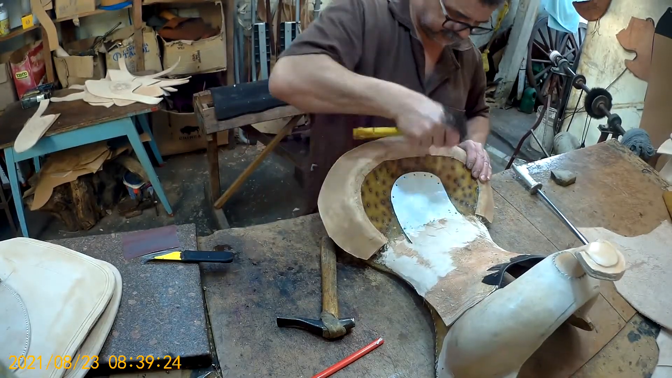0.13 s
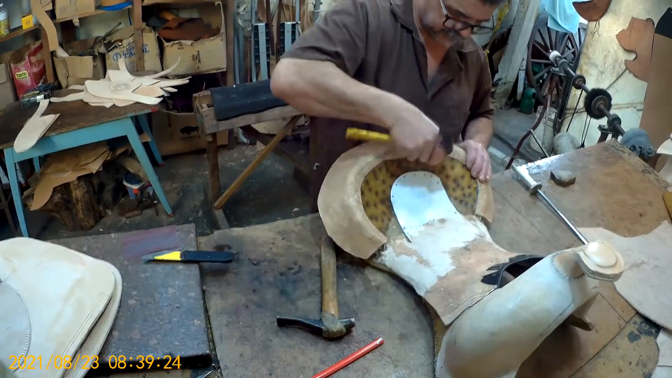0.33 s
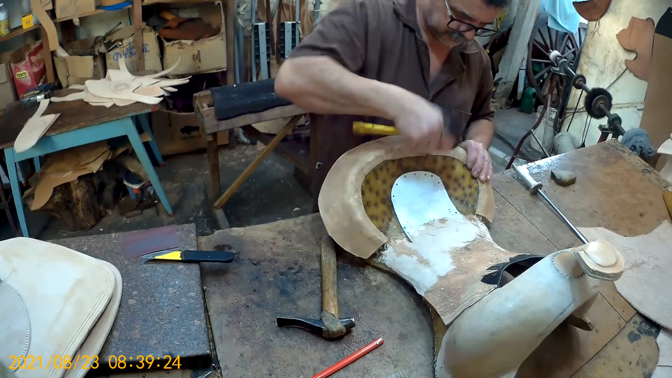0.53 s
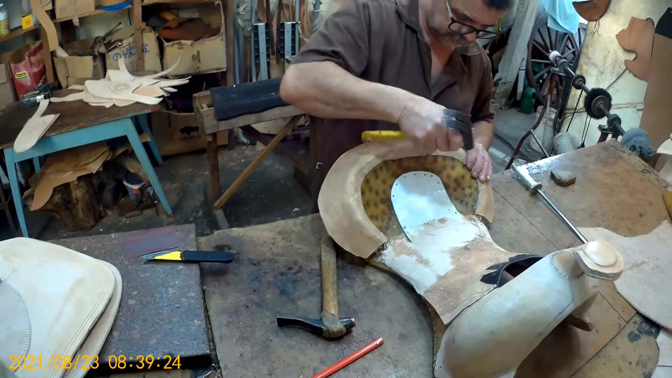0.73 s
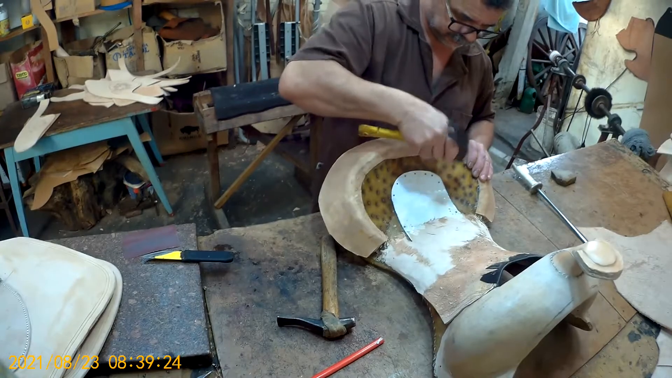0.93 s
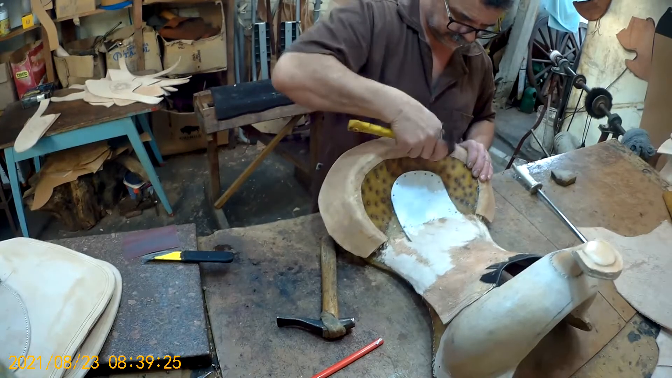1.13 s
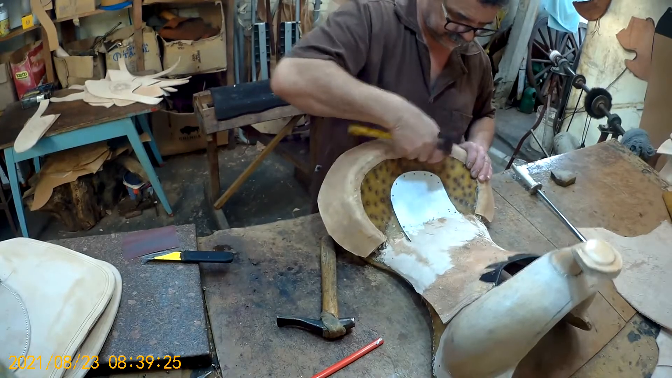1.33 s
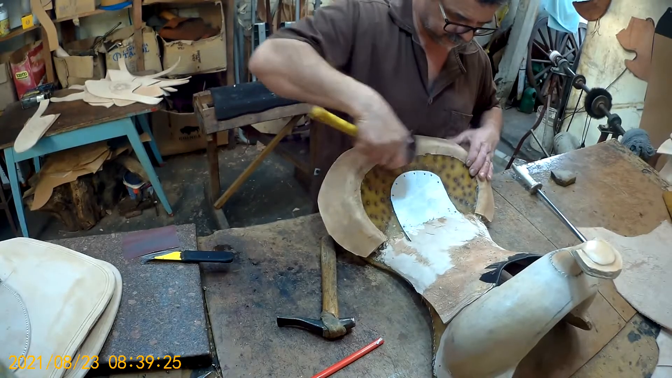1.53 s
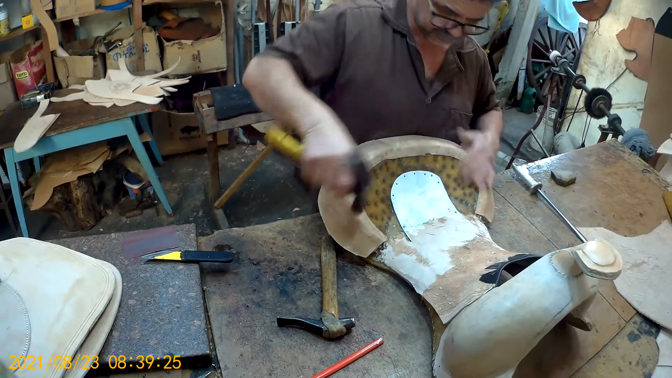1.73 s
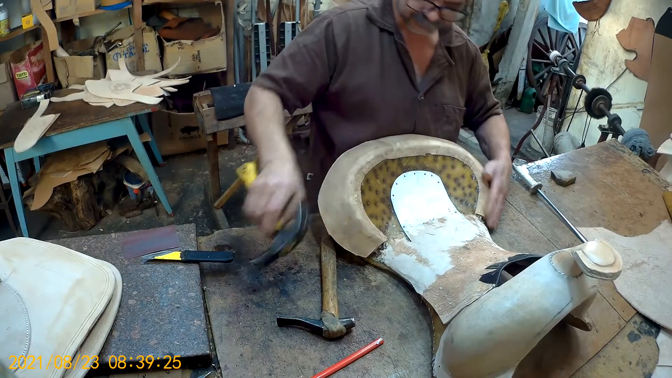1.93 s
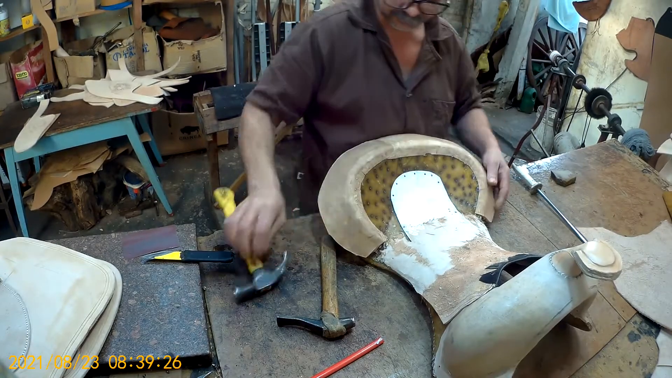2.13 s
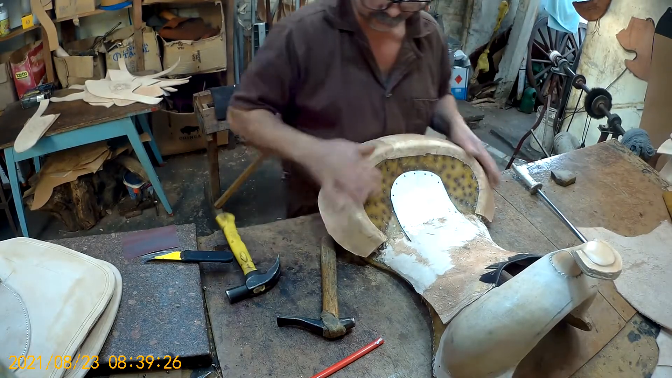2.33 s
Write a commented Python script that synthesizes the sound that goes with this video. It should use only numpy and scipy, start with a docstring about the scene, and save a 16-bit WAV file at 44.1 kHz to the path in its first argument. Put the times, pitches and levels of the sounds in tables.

```python
"""In a workshop, a small hammer taps five times on the leather-covered rim of a saddle, grazes it
once more, and is laid down on the wooden workbench, where it rocks to rest; a hand rubs leather faintly.
Struck bodies are sums of decaying modes; slaps, clicks and rattles are decaying shaped noise.
Echoes and diffuse tails answer the hammer; the near microphone overloads and its gain control ducks."""
import sys
import numpy as np
from scipy import signal
from scipy.fft import irfft
from scipy.io import wavfile

SR = 44100
rng = np.random.default_rng(int(sys.argv[2]) if len(sys.argv) > 2 else 0)


def inscribe(sig):
    """Save sig as 16-bit PCM at rate SR to the path in sys.argv[1].

    A 1-D sig is mono; a 2-D sig holds one channel per row.
    Samples are clipped to [-1, 1] before scaling.
    """
    pcm = np.round(np.clip(np.atleast_2d(sig).T, -1, 1) * 32767)
    wavfile.write(sys.argv[1], SR, pcm.astype(np.int16))


N = 110250

# Hand sliding over leather. Each row: time in seconds, level in dB.
RUB_LEVEL = [(1.4, -45.5), (1.51, -40), (1.6, -44.5), (1.73, -38), (1.9, -46.5), (2.15, -37), (2.38, -39),
             (2.5, -44.5)]
# Spectrum of that friction. Each row: frequency in Hz, relative level in dB.
RUB_SPECTRUM = [(300, -14), (1200, 14), (2500, 9.5), (3800, 8.5), (5200, -3.5), (7000, -0.5), (10000, -1),
                (16000, -2)]

# Blows on the rim. Each row: start in seconds, level in dB, pitch ratio of the knock,
# ring of the frame in dB relative to the blow.
TAPS = [(.2067, 2.5, 0.99, 2.5), (.4840, 3, 1.0, 2), (0.7332, 2, 0.96, 3.5), (0.9761, 2.5, 0.99, -1),
        (1.2229, 1.5, 0.97, 2)]
# Modes of the knock under the hammer face. Each row: frequency in Hz before the pitch ratio,
# relative level in dB, T60 in seconds.
KNOCK_MODES = [(957, 12.5, 0.01), (697.7, 3, 0.079), (741.7, 4.5, 0.07), (1016, -0.5, 0.01),
               (390.3, 0, 0.052), (1706, -12, 0.023), (2650, -8.5, 0.01), (4630, -9, 0.014)]
# Modes of the saddle frame and its stand. Each row: frequency in Hz, mean relative level in dB,
# T60 in seconds.
SADDLE_MODES = [(43.4, -14, 0.2), (77, -16, .3), (115.6, -7, 0.34), (161.2, -4.5, 0.085), (232.3, -15, .28),
                (275.4, -11.5, .13), (401, -23.5, .17), (439.6, -19.5, 0.43), (502.6, -20.5, 0.31),
                (715, -31.5, 0.3), (750, -29, 0.66), (825, -19, 0.32), (1079, -31, 0.41), (1163, -32, 0.36)]
FRAME_SWELL_CYCLES, RING_SPREAD_DB = 1.1, 1.33  # build-up constant; random spread of mode levels
# Spectrum of the leather slap. Each row: frequency in Hz, relative level in dB.
SLAP_SPECTRUM = [(100, -7.5), (400, -7), (900, -3.5), (1500, -10.5), (2600, -37.5), (4000, -21),
                 (8000, -33), (16000, -63)]
SLAP_DB, SLAP_T60_S = 1.5, 0.02
SLAP_DRIFT = 0.45  # amplitude of the fresh noise added to the slap shared by all blows

# Contacts as the hammer grazes the rim. Each row: start in seconds, relative level in dB.
GRAZES = [(1.4721, -1), (1.489, -6.5), (1.512, -3), (1.539, -5.5), (1.553, -13.5)]
# Spectrum of contacts and drag. Each row: frequency in Hz, relative level in dB.
GRAZE_SPECTRUM = [(50, -11), (130, -1), (550, 1), (750, -4.5), (1100, 5), (1600, -12.5), (2400, -24),
                  (4000, -44), (8000, -31), (16000, -50)]
GRAZE_DB, GRAZE_T60_S, GRAZE_RISE_S = -10.5, 0.051, 0.00077
DRAG_END_S, DRAG_START_DB, DRAG_RISE_DB = 1.57, -25, 3
GRAZE_RING_DB, GRAZE_ROOM_DB = -19, -9.5

# Head and handle landing on the bench. Each row: start in seconds, level in dB, low-mode thud in dB,
# relative click in dB, knock frequency in Hz, relative knock in dB, relative rattle in dB.
LANDINGS = [(1.9932, -4, 7.5, -19, 637, 6, 5.5), (2.0758, 2.5, 2, -4, 764, 8, -6),
            (2.0919, 2.5, -9.5, 4, 916, 5.5, 3), (2.138, -7.5, -31, -15, 1076, 8.5, -8),
            (2.1522, 4, 4, -5.5, 820, 1.5, -0.5), (2.195, -3, -29, -5, 994, -3, 3),
            (2.2957, -10, -7, -23, 945, 3, -1), (2.371, -20.5, 0, -19, 780, -2, 4.5)]
# Modes of the bench top. Each row: frequency in Hz, level in dB before the thud, T60 in seconds.
BENCH_MODES = [(145, -11, 0.088), (264, -9.5, 0.15), (350.3, -9.5, .16), (449, -8.5, 0.051),
               (675, -12.5, .09), (783, -5, 0.058), (866.6, -8.5, 0.089), (1008, -3.5, 0.036),
               (1166, -28.5, 0.17), (1423, -18.5, 0.15), (1550, -20, 0.19), (2390, -23, 0.079)]
BENCH_SWELL_CYCLES, THUD_HZ, LANDING_T60_S = 0.99, 403, 0.027
# Spectrum of the wooden impact. Each row: frequency in Hz, relative level in dB.
WOOD_SPECTRUM = [(40, -33), (130, -3), (300, -7), (900, -5), (1400, -9), (2200, -21.5), (4000, -35.5),
                 (16000, -66)]
WOOD_DB, WOOD_T60_S = 1, 0.041
# Spectrum of the steel click. Each row: frequency in Hz, relative level in dB.
CLICK_SPECTRUM = [(500, -4), (1500, -8), (3000, -2.5), (4500, 1.5), (5500, -17), (7200, -11), (10000, -1.5),
                  (16000, -15)]
CLICK_DB, CLICK_T60_S = -14.5, 0.038
# Spectrum of loose tools rattling. Each row: frequency in Hz, relative level in dB.
RATTLE_SPECTRUM = [(60, -27), (200, -8), (400, -7), (700, 0.5), (1200, 2.5), (1500, -10), (2200, -14),
                   (3200, -29), (5500, -40), (7000, -29.5), (9000, -54), (16000, -52)]
RATTLE_DB, RATTLE_T60_S, RATTLE_RISE_S = -15.5, 0.35, 0.012

# Reflections from near walls and ceiling. Each row: delay in seconds, level in dB.
ECHOES = [(.0042, -21.5), (.0098, -31), (0.02, -21.5), (.0262, -28.5)]
# Reverberation time. Each row: frequency in Hz, T60 in seconds.
ROOM_T60 = [(60, .45), (160, 0.72), (420, 0.33), (1100, .42), (2900, 0.21), (8000, .15)]
# Colour of the reverberation. Each row: frequency in Hz, relative level in dB.
ROOM_SPECTRUM = [(50, 2.5), (120, -14), (300, -1), (700, -1), (1200, -2.5), (2500, 1.5), (5000, -14),
                 (12000, -3.5)]
TAP_ROOM_DB, BENCH_ROOM_DB, ROOM_START_S = -13, -12, 0.0072
ROOM_DRIFT = 0.44  # amplitude of the fresh tail added to the one shared by all taps

# Spectrum of the background hiss. Each row: frequency in Hz, relative level in dB.
AIR_SPECTRUM = [(20, -10.5), (45, 0.5), (120, 2.5), (230, -1), (400, -2), (600, -5.5), (1100, -5),
                (2100, -24), (3500, -30), (8000, -24), (14000, -26.5), (16000, -31)]
AIR_DB = -41  # before the gain control
DUCK_FROM_DB, DUCK_DB_PER_DB, DUCK_ATTACK_S = -20, 0.34, 0.037
HELD_FALL_DB_PER_S = 90.5  # fall of the held level, not of the gain reduction
CEILING = 0.88  # full scale is 1
TREBLE_HZ, TREBLE_DB, EDGE_HZ = 8620, -15.5, 16000.0


def amp(db):
    """Decibels are twenty times the logarithm of an amplitude ratio; this inverts them."""
    return 10 ** (np.asarray(db) / 20)


def read(points, hz):
    """Linear interpolation along a logarithmic frequency axis."""
    f, value = np.transpose(points)
    return np.interp(np.log(hz + 1), np.log(f + 1), value)


def add(mix, s, sound):
    """Superposition: pressures add, here from a given time in seconds."""
    part = mix[round(s * SR):][:len(sound)]
    part += sound[:len(part)]


def clock():
    """Time axis in seconds on which one impact evolves, half a second long."""
    return np.arange(SR // 2) / SR


def noise(spectrum, size):
    """Random phases under a given spectrum make stationary noise, scaled to unit RMS."""
    hz = np.fft.rfftfreq(size, 1 / SR)
    phases = np.exp(2j * np.pi * rng.random(len(hz)))
    x = irfft(amp(read(spectrum, hz)) * (hz > 0) * phases, size)
    return x / x.std()


def dying(t, t60):
    """Exponential decay: the amplitude falls by 60 dB in one T60."""
    return np.exp(-np.log(1000) * t / t60)


def burst(spectrum, t60):
    """Countless short resonances excited at once act as decaying noise of fixed energy."""
    fade = dying(clock(), t60)
    x = noise(spectrum, len(fade)) * fade
    return x * np.linalg.norm(fade) / np.linalg.norm(x)


def mode(hz, db, t60):
    """A damped resonance is a sine under an exponential decay."""
    t = clock()
    return amp(db) * dying(t, t60) * np.sin(2 * np.pi * hz * t)


def swelling(hz, db, t60, cycles):
    """A heavy body takes up energy gradually: its mode builds up over a few cycles."""
    return mode(hz, db, t60) * (1 - np.exp(-clock() * hz / cycles))


def tail():
    """Diffuse reverberation: dense random reflections, each band decaying at its own rate."""
    t = clock()
    hz, frame_s, z = signal.stft(rng.choice([-1., 1.], len(t)), SR, nperseg=256)
    z = z * dying(frame_s, read(ROOM_T60, hz)[:, None])
    uncoloured = signal.istft(z, SR, nperseg=256)[1]
    x = signal.istft(z * amp(read(ROOM_SPECTRUM, hz))[:, None], SR, nperseg=256)[1][:len(t)]
    onset = np.clip(t / ROOM_START_S - 1, 0, 1)  # silent for one start time, full after two
    return x / np.linalg.norm(uncoloured) * onset


def workshop(x, reverb, room_db):
    """Linear room response: convolution with direct sound, discrete reflections and diffuse tail."""
    response = amp(room_db) * reverb
    response[0] += 1
    for delay, db in ECHOES:
        add(response, delay, [amp(db)])
    return signal.fftconvolve(x, response)


def hand_rub():
    """Sliding friction of skin on leather is noise whose level wanders."""
    return noise(RUB_SPECTRUM, N) * amp(np.interp(np.arange(N) / SR, *np.transpose(RUB_LEVEL)))


def frame_ring():
    """Modal superposition: one blow sets the saddle frame and stand ringing, in alternating polarity."""
    ring = 0
    for k, (hz, db, t60) in enumerate(SADDLE_MODES):
        level = db + RING_SPREAD_DB * rng.standard_normal()
        ring = ring + (-1) ** k * swelling(hz, level, t60, FRAME_SWELL_CYCLES)
    return ring


def hammer_taps():
    """Impact excites a slap and a knock with a beating close pair of modes; the spot barely moves."""
    out, same_room, same_slap = np.zeros(N), tail(), burst(SLAP_SPECTRUM, SLAP_T60_S)
    for s, db, pitch, ring_db in TAPS:
        knock = sum(mode(hz * pitch, level, t60) for hz, level, t60 in KNOCK_MODES)
        slap = amp(SLAP_DB) * (same_slap + SLAP_DRIFT * burst(SLAP_SPECTRUM, SLAP_T60_S))
        reverb = same_room + ROOM_DRIFT * tail()
        add(out, s, amp(db) * workshop(knock + slap, reverb, TAP_ROOM_DB))
        add(out, s, amp(db + ring_db) * frame_ring())
    return out


def hammer_graze():
    """Light dull impacts and a short drag by friction, as the hammer skips off the rim."""
    out, start = np.zeros(N), GRAZES[0][0]
    rise = np.minimum(clock() / GRAZE_RISE_S, 1)
    for s, db in GRAZES:
        add(out, s, amp(GRAZE_DB + db) * burst(GRAZE_SPECTRUM, GRAZE_T60_S) * rise)
    along = clock() / (DRAG_END_S - start)  # 0 to 1 during the drag
    ends = np.clip(10 * np.minimum(along, 1 - along), 0, 1)
    drag = noise(GRAZE_SPECTRUM, len(along)) * amp(DRAG_START_DB + DRAG_RISE_DB * along)
    add(out, start, drag * ends)
    add(out, start, amp(GRAZE_RING_DB) * frame_ring())
    return workshop(out, tail(), GRAZE_ROOM_DB)[:N]


def bench_ring(thud_db):
    """Modal superposition in the bench top, in alternating polarity; the thud weights the low modes."""
    ring = 0
    for k, (hz, db, t60) in enumerate(BENCH_MODES):
        level = db + thud_db / (1 + (hz / THUD_HZ) ** 4)
        ring = ring + (-1) ** k * swelling(hz, level, t60, BENCH_SWELL_CYCLES)
    return ring


def hammer_laid_down():
    """Impacts at different spots excite the bench differently, with steel clicks and rattling tools."""
    out = np.zeros(N)
    rise = np.minimum(clock() / RATTLE_RISE_S, 1)
    for s, db, thud_db, click_db, knock_hz, knock_db, rattle_db in LANDINGS:
        knock = mode(knock_hz, knock_db, LANDING_T60_S)
        wood = amp(WOOD_DB) * burst(WOOD_SPECTRUM, WOOD_T60_S)
        click = amp(CLICK_DB + click_db) * burst(CLICK_SPECTRUM, CLICK_T60_S)
        hit = bench_ring(thud_db) + knock + wood + click
        rattle = amp(RATTLE_DB + rattle_db) * burst(RATTLE_SPECTRUM, RATTLE_T60_S) * rise
        add(out, s, amp(db) * (hit + rattle))
        add(out, s, amp(db + BENCH_ROOM_DB) * signal.fftconvolve(hit, tail()))
    return out


def scene():
    """Superposition of all the hammer's sounds and the hand, in one channel."""
    return (hammer_taps() + hammer_graze() + hammer_laid_down() + hand_rub())[None]


def duck_gain(x):
    """Feed-forward gain control: the smoothed, held level lowers the gain, too slowly for the knocks."""
    r = np.exp(-1 / (DUCK_ATTACK_S * SR))
    power = signal.lfilter([1 - r], [1, -r], np.clip(x, -1, 1) ** 2)
    power_db = 10 * np.log10(abs(power) + 1e-12)
    fall = np.arange(N) / SR * HELD_FALL_DB_PER_S
    held_db = np.maximum.accumulate(power_db + fall) - fall  # peak hold, falling steadily in dB
    over_db = np.maximum(held_db - DUCK_FROM_DB, 0)
    return amp(-DUCK_DB_PER_DB * signal.lfilter([1 - r], [1, -r], over_db))


def record(dry):
    """Microphone chain: gain control, hard clipping, dulled treble, hiss under the same gain, band limit."""
    gain = duck_gain(dry[0])
    x = np.clip(dry[0] * gain, -CEILING, CEILING)
    low = signal.oaconvolve(x, signal.firwin(numtaps=101, cutoff=TREBLE_HZ, fs=SR), "same")
    hiss = gain * amp(AIR_DB) * noise(AIR_SPECTRUM, N)
    x = low + amp(TREBLE_DB) * (x - low) + hiss
    return signal.oaconvolve(x, signal.firwin(511, EDGE_HZ, window=("kaiser", 9), fs=SR), "same")[None]


dry = scene()
out = record(dry)
inscribe(out)
```